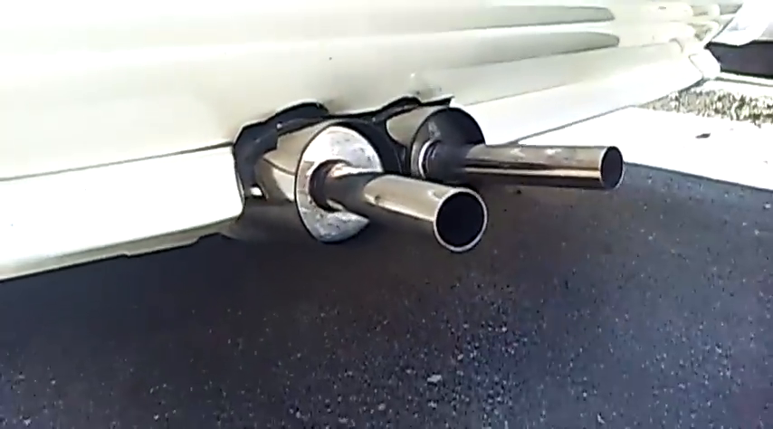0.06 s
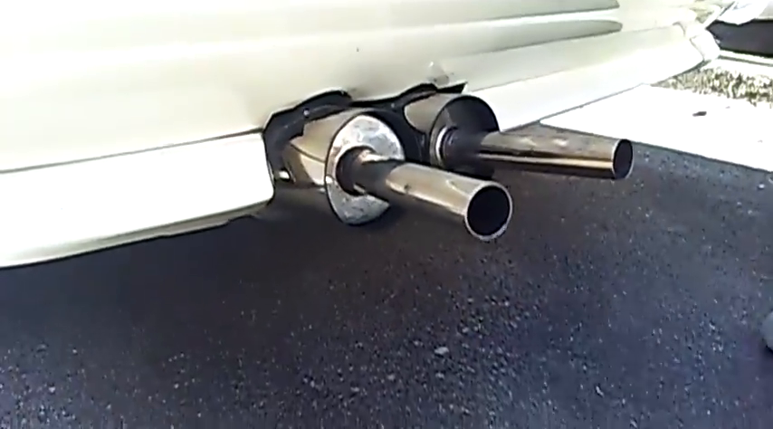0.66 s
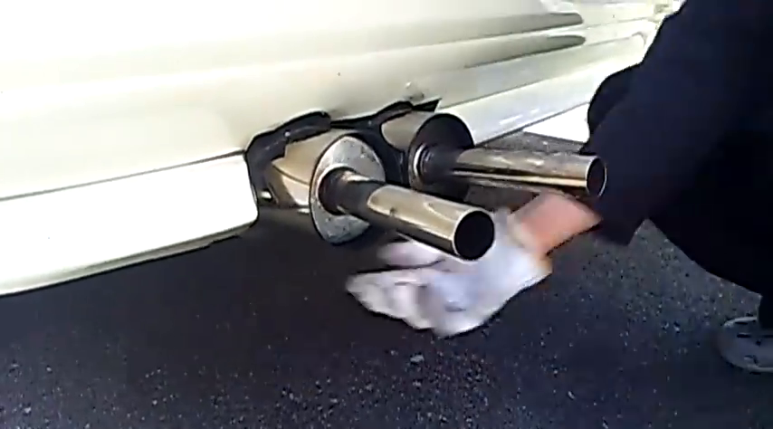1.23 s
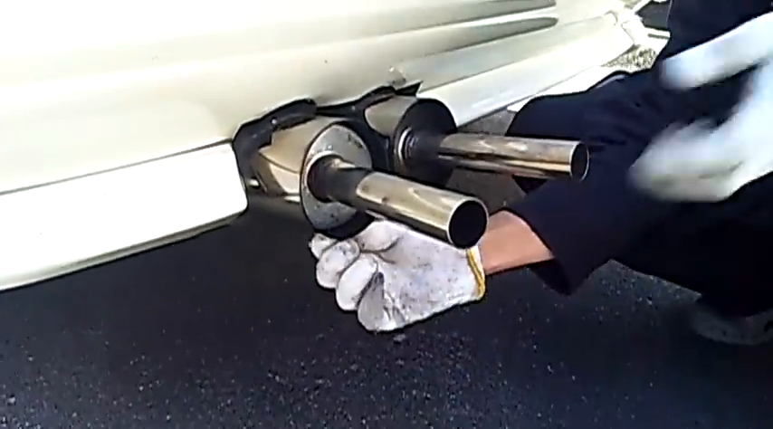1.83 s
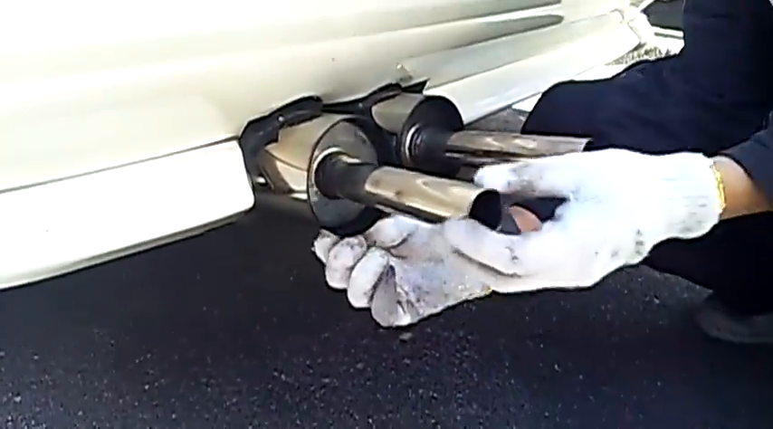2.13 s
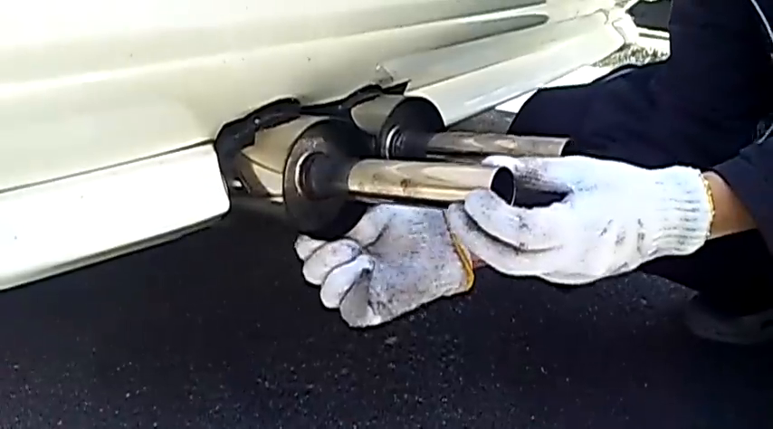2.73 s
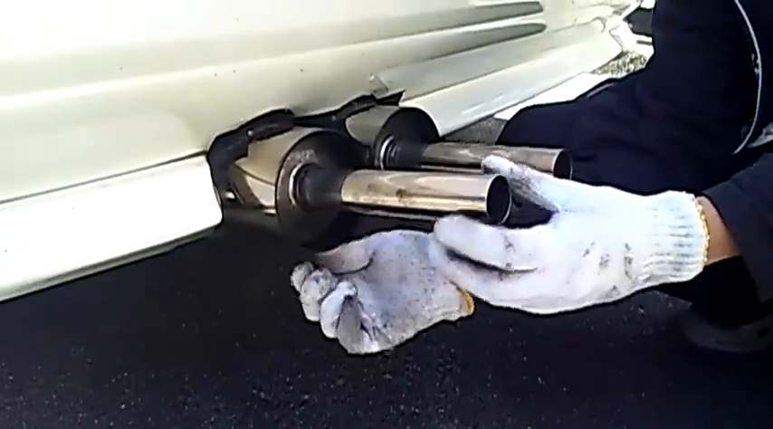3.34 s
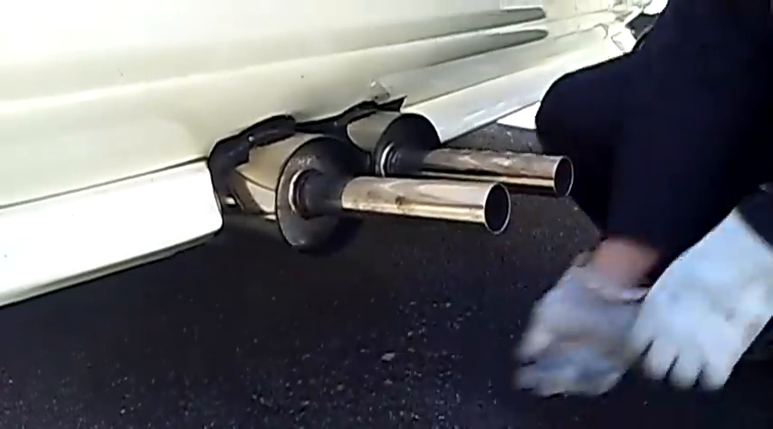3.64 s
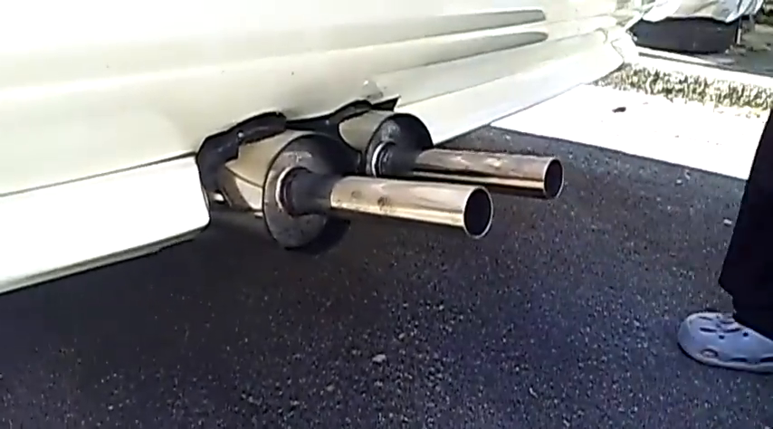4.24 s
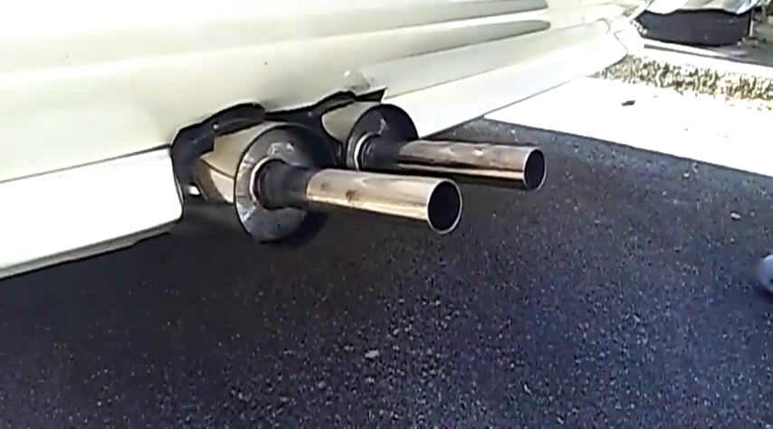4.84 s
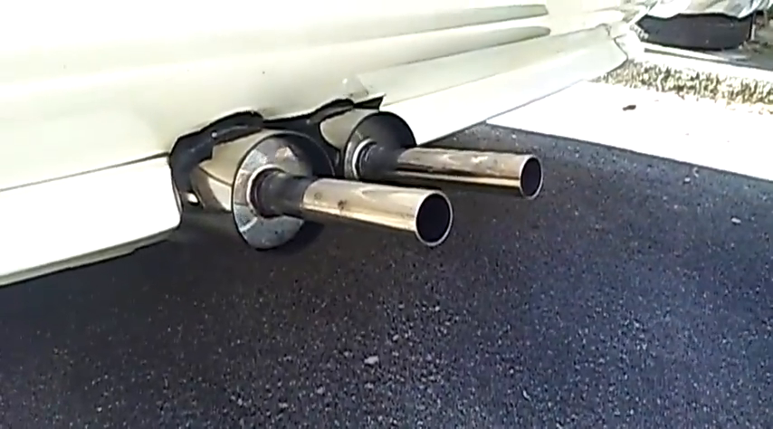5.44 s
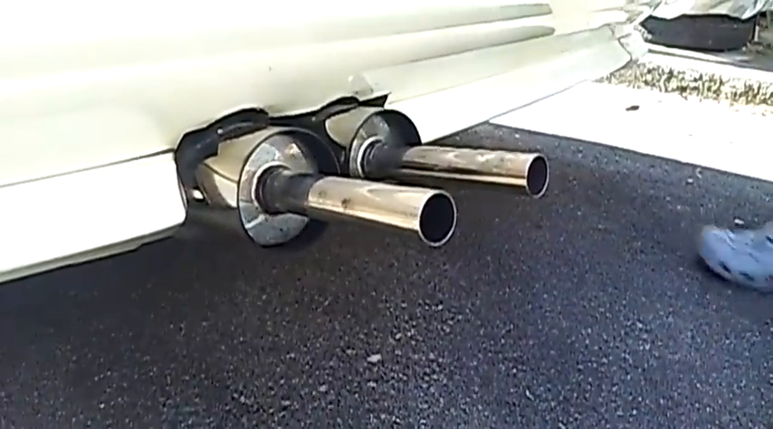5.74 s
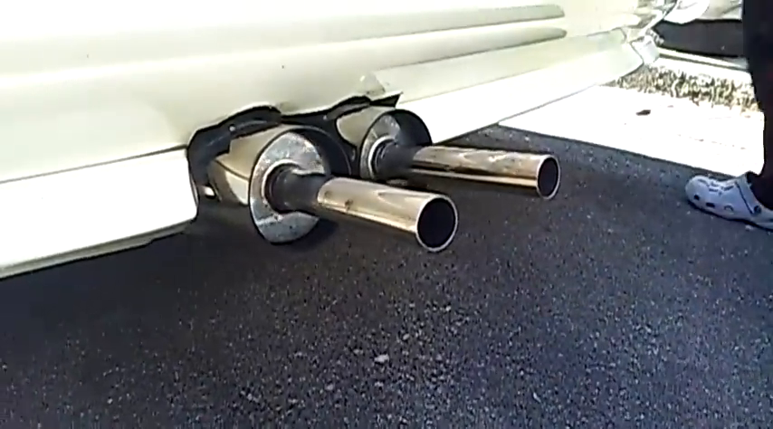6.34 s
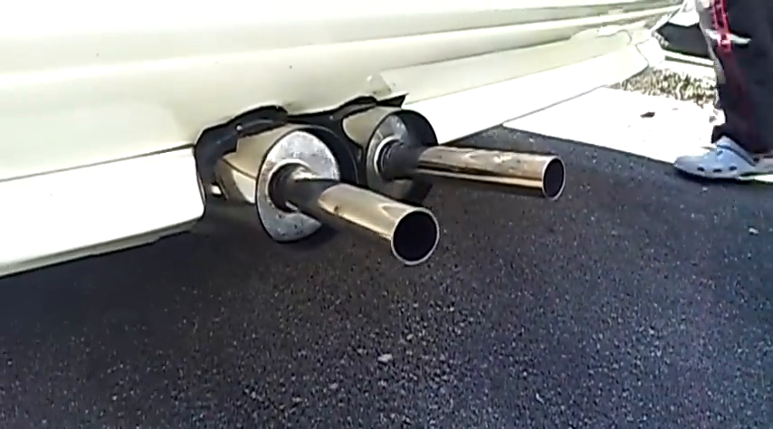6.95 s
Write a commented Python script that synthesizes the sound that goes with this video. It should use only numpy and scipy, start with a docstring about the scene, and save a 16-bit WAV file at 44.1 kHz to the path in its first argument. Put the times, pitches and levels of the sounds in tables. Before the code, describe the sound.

A six-cylinder car idles steadily close to its exhaust tips, with a thin metal rattle that stops when a gloved hand takes hold.

```python
"""A six-cylinder car idles, close to its twin exhaust tips: each firing booms in the silencer and barks
from the pipes, the note turning hollow at times as the bounce off the asphalt cancels its middle.
Over a bed of hiss, loose thin metal rattles and sizzles in step with the engine, and whistles, until
a gloved hand takes hold of a tip. The hand cups the bark, then lets go.
Small knocks, glove and shoe scuffs and rustling clothes dot the scene."""
import sys
import numpy as np
from scipy.fft import rfft, irfft, next_fast_len
from scipy.io import wavfile
from scipy.ndimage import map_coordinates

SR = 44100
rng = np.random.default_rng(int(sys.argv[2]) if len(sys.argv) > 2 else 0)


def digitize_waveform(pressure):
    """Quantize a signal to 16-bit integers and store it at the path in sys.argv[1].

    Rows of a 2-D input are taken as channels; values are limited to [-1, 1].
    """
    field = np.atleast_2d(pressure).T
    bounded = np.clip(field, -1, 1)
    quanta = np.round(bounded * 32767).astype(np.int16)
    wavfile.write(sys.argv[1], SR, quanta)


N = 316638
SIZE = next_fast_len(N + SR // 2)
HZ = np.fft.rfftfreq(SIZE, 1 / SR)
TIME = np.arange(N) / SR

# outdoor low end: (frequency [Hz], relative level [dB])
RUMBLE_EQ = [(15, -12), (40, -13.5), (80, -4), (103, -14), (150, 7), (300, -5.5), (600, -46)]
# airy top of gas and cloth: (frequency [Hz], relative level [dB])
HISS_EQ = [(1470, -32), (2500, -3), (2780, -8), (3050, -9), (3580, -12.5), (5050, -4.5), (6890, -10.5),
           (7300, -18), (9490, -41.5), (16100, -120)]
# moving clothes: (start [s], end [s], level [dB])
CLOTH_MOVES = [(3.766, 4.485, -40.5), (6.738, 7.4, -34.5)]
# glove and shoe scrapes: (time [s], level [dB], 60 dB decay [s], centre [Hz])
SCUFF_CUES = [(0.7295, -16, 0.063, 6250), (2.055, -25, 0.25, 6060), (2.094, -24, .13, 6800),
              (4.015, -24.5, 0.15, 5670), (4.142, -30, 0.25, 5940), (4.502, -26.5, 0.23, 5940),
              (5.682, -28, 0.074, 5500), (6.044, -28.5, 0.1, 4020), (6.172, -25, 0.13, 1500),
              (6.663, -21, .045, 6220), (6.695, -30, 0.079, 5830)]
# small hard knocks: (time [s], level [dB], centre [Hz])
KNOCK_CUES = [(0.726, -22, 3190), (0.735, -10.5, 3100), (4.0158, -15.5, 2180), (5.262, -20.5, 2330)]
# thin whistles: (pitch [Hz], wander [Hz], relative level [dB])
WHISTLE_TONES = [(5534, 6, 0), (3531, 10, -8)]
# ring of the thin metal: (frequency [Hz], width [Hz], relative level [dB])
METAL_MODES = [(1413, 150, 9), (1645, 240, 5.5), (1970, 270, 6), (2360, 260, 0), (2870, 210, -3.5),
               (3610, 360, -1.5), (3960, 62, 3), (4570, 900, -5.5), (5000, 73, 4), (5390, 57, 5.5),
               (5920, 110, 2.5), (6140, 260, -2.5), (6200, 130, -7), (6630, 61, 4), (6910, 420, -0.5)]
# the idle, hunting slightly: (time [s], firing rate [Hz])
IDLE_RATE = [(0.0, 56.38), (1.03, 56.81), (1.04, 56.13), (1.54, 57.21), (1.71, 56.46), (2.08, 56.83),
             (3.55, 56.72), (3.7, 56.12), (4.25, 57.15), (4.96, 56.32), (5.4, 56.7), (6.39, 57.02),
             (6.56, 56.39), (7.18, 57.5)]
# the engine's groove, in firing order: (lateness [ms], accent [dB])
FIRING_ORDER = [(.15, 2.3), (-.13, -2.1), (.04, 1.4), (-.03, -.5), (0, 1.8), (-.05, -2.9)]
# spells of hollow exhaust tone: (start [s], end [s], fade [s], share cancelled [0-1])
HOLLOW_SPELLS = [(-.2, 2.2, .13, .6), (6.25, 7.45, .4, .66)]
# bite of a steep pressure front: (frequency [Hz], relative level [dB])
FRONT_EQ = [(130, -37), (300, -21.5), (420, -2.5), (570, -5), (830, 10.5), (1050, 3), (1400, -1.5),
            (1650, -6.5), (2050, -18.5), (2250, -16.5), (2850, -33.5), (5000, -33), (8000, -51.5)]
# reflections inside the pipes: (delay [ms], gain [ratio])
PIPE_ECHOES = [(1.62, 0.43), (3.4, -0.16), (4.45, 0.33), (9.3, -0.014)]
# breath of turbulent gas: (frequency [Hz], relative level [dB])
TURBULENCE_EQ = [(110, -50.5), (220, 2), (360, -3.5), (470, 0.5), (580, -0.5), (780, 1), (1150, -6),
                 (1450, -3), (1950, -13), (2100, -3.5), (2230, -18.5), (2700, -22), (4000, -24.5),
                 (8000, -34.5)]
# body of the silencer: (frequency [Hz], width [Hz], relative level [dB])
SILENCER_MODES = [(236.1, 30.4, 0), (416.6, 41.7, -12.5)]

GRIP_S, RELEASED_S, CLOSE_S, OPEN_S = 2.1, 4.1, .08, 1  # hand on, hand fully off, length of each move
TOUCH_S, DAMP_DB_PER_S = 1.987, 174.5  # a touch chokes the metal
HISS_DB, METAL_DB, BARK_DB = -37.5, -21.5, -24  # base levels, ahead of each layer's trims
SHADE_DB = 1.26  # the glove ducks bark and hiss


def amp(db):
    """Decibels to gain."""
    return 10 ** (np.asarray(db) / 20)


def unit(x):
    """x at rms 1."""
    return x / np.sqrt(np.mean(x ** 2) + 1e-20)


def eq(points):
    """Gain curve through (Hz, dB) points on a log axis."""
    hz, db = np.transpose(points)
    return amp(np.interp(np.log(HZ + 1), np.log(hz), db))


def resonance(hz, width, f=HZ):
    """Causal response of one mode."""
    return 1j * f * width / (hz * hz - f ** 2 + 1j * f * width)


def delay(ms):
    """Response of a travel time."""
    return np.exp(-2j * np.pi * HZ * ms / 1000)


def filtered(x, response):
    """x through a frequency response."""
    return irfft(rfft(x, SIZE) * response, SIZE)[:N]


def noise(response):
    """Coloured noise of rms 1."""
    return unit(filtered(rng.standard_normal(SIZE), response))


def pulses(times, sizes):
    """Impulses between samples; those before time zero still ring into the sound."""
    at = times[:, None] * SR
    taps = np.floor(at).astype(int) + np.arange(-7, 9)
    shape = np.sinc(taps - at) * np.sinc((taps - at) / 8)
    return np.bincount((taps % SIZE).ravel(), (sizes[:, None] * shape).ravel(), SIZE)


def wobble(rate):
    """Smooth random modulation, rate knots a second."""
    return map_coordinates(rng.standard_normal(4096), [TIME * rate], mode="wrap")


def spell(start, end, rise, fall):
    """0-1 envelope: fade in from the start, hold, fade out by the end."""
    return np.clip(np.minimum((TIME - start) / rise, (end - TIME) / fall), 0, 1)


def grip():
    """How closely the hand holds the tip, 0-1."""
    return spell(GRIP_S, RELEASED_S, CLOSE_S, OPEN_S)


def looseness():
    """How freely the thin metal vibrates: 1 until it is touched, then damped to 0."""
    return amp(-DAMP_DB_PER_S * np.maximum(TIME - TOUCH_S, 0))


def rumble(level_db):
    """A faint outdoor bed under everything."""
    return amp(level_db) * noise(eq(RUMBLE_EQ))


def hiss(turns, flutter, lift_db):
    """Gas and engine bay hiss, pulsing twice a firing and lifted while the metal is loose."""
    level = amp(HISS_DB + lift_db * looseness() - SHADE_DB * grip())
    pulsing = 1 + flutter * np.cos(2 * np.pi * 2 * turns)
    return level * pulsing * noise(eq(HISS_EQ))


def contact(start, db, t60, hz, width):
    """A brief contact: noise in one broad resonance, with a hard attack and a dying tail."""
    age = np.arange(SR // 2) / SR
    band = resonance(hz, width, np.fft.rfftfreq(len(age), 1 / SR)) ** 2
    burst = unit(irfft(rfft(rng.standard_normal(len(age))) * band))
    return np.pad(burst * amp(db - 60 * age / t60), (round(start * SR), N))[:N]


def scuffs(width_hz, fade_s, grit_db):
    """Glove and shoes scrape and clothes softly rustle, all with the same gritty grain."""
    scrapes = sum(contact(s, db, t60, hz, width_hz) for s, db, t60, hz in SCUFF_CUES)
    movement = sum(amp(db) * spell(start, end, fade_s, fade_s) for start, end, db in CLOTH_MOVES)
    cloth = movement * noise(eq(HISS_EQ))
    return (scrapes + cloth) * unit(amp(grit_db * wobble(300)))


def knocks(t60_s, width_ratio):
    """Small hard knocks, each dying away in one broad resonance."""
    return sum(contact(s, db, t60_s, hz, width_ratio * hz) for s, db, hz in KNOCK_CUES)


def whistle(level_db, peak_s, fade_db_per_s, waver_db):
    """Two thin tones from the loose metal waver in pitch and level, swell, then slowly fade."""
    tones = 0
    for hz, wander, db in WHISTLE_TONES:
        level = amp(db + waver_db * wobble(40))
        pitch = hz + wander * wobble(60)
        tones += level * np.sin(2 * np.pi * np.cumsum(pitch) / SR)
    swell = amp(level_db - fade_db_per_s * np.abs(TIME - peak_s))
    return swell * looseness() * unit(tones)


def rattle(times, after_ms, jitter_ms, scatter_db, ring_hz, width_hz, trim_db):
    """The loose metal clinks once between firings, never twice alike."""
    slip, accent = rng.standard_normal((len(times), 2)).T
    hits = pulses(times + (after_ms + jitter_ms * slip) / 1000, amp(scatter_db * accent))
    clinks = unit(filtered(hits, resonance(ring_hz, width_hz) ** 2))
    return amp(METAL_DB + trim_db) * looseness() * clinks


def sizzle(turns, flutter, trim_db):
    """Thin metal buzzes in its modes, swelling with the firings."""
    power = sum(np.abs(amp(db) * resonance(hz, width) ** 2) ** 2 for hz, width, db in METAL_MODES)
    shake = rng.standard_normal(N) * (1 + flutter * np.cos(2 * np.pi * turns))
    return amp(METAL_DB + trim_db) * looseness() * unit(filtered(shake, np.sqrt(power)))


def firings(turns, jitter_ms, scatter_db):
    """Times and strengths of the exhaust blows: each cylinder has its own timing and accent."""
    n = np.arange(-len(FIRING_ORDER), int(turns[-1]) + 1)
    late_ms, db = np.array(FIRING_ORDER)[n % len(FIRING_ORDER)].T
    slip, accent = rng.standard_normal((len(n), 2)).T
    pre_roll = np.minimum(n - turns[0], 0) / IDLE_RATE[0][1]  # the engine is already running
    due = np.interp(n, turns, TIME) + pre_roll
    return due + (late_ms + jitter_ms * slip) / 1000, amp(db + scatter_db * accent)


def hollowed(x, notch_hz, width_hz):
    """From some angles the bounce off the asphalt scoops the mids out of the exhaust note."""
    depth = sum(share * spell(start, end, fade, fade) for start, end, fade, share in HOLLOW_SPELLS)
    return x - depth * filtered(x, resonance(notch_hz, width_hz))


def cupped(x, ring_hz, width_hz, cup_db):
    """A hand at the tip forms a small hollow that lifts one band."""
    return x + amp(cup_db) * grip() * filtered(x, resonance(ring_hz, width_hz))


def bark(times, sizes, accent_power, scatter_db, front_db, puff_db, puff_ms, stream_db):
    """Each blow steepens to a sharp front in the pipe and tears a puff of turbulence from the tip."""
    blows = pulses(times, sizes ** accent_power * amp(scatter_db * rng.standard_normal(len(times))))
    echoes = 1 + sum(gain * delay(ms) for ms, gain in PIPE_ECHOES)
    front = unit(filtered(blows, -1j * eq(FRONT_EQ) * echoes))  # a jump from suction to pressure
    front = cupped(front, ring_hz=570, width_hz=22, cup_db=13)
    gusts = delay(-.35) + delay(PIPE_ECHOES[-1][0] - .3)  # one with the blow, one with its last echo
    gate = np.abs(filtered(blows, gusts / (1 + 2j * np.pi * HZ * puff_ms / 1000)))
    puffs = unit(filtered(gate * rng.standard_normal(N), eq(TURBULENCE_EQ)))
    stream = noise(eq(TURBULENCE_EQ))
    blend = amp(front_db) * front + amp(puff_db) * puffs + amp(stream_db) * stream
    return amp(BARK_DB - SHADE_DB * grip()) * blend


def boom(times, sizes, turns, lead_ms, soft_hz, low_cut_hz, boom_db, leak_db, throb_db):
    """The broad push of each blow rings the silencer, over a throb at the firing rate."""
    low_cut = HZ ** 10 / (HZ ** 10 + low_cut_hz ** 10)
    push = np.exp(-(HZ / soft_hz) ** 2) * low_cut * delay(-lead_ms)
    modes = sum(amp(db) * resonance(hz, width) for hz, width, db in SILENCER_MODES)
    body = modes + amp(leak_db)  # part passes straight through
    ring = unit(filtered(pulses(times, sizes), -push * body))
    throb = unit(np.cos(2 * np.pi * turns))
    return amp(boom_db) * ring - amp(throb_db) * throb


def scene():
    """The mix: exhaust up front, with metal and hiss on the same firing clock, and foley around it."""
    rate = np.interp(TIME, *np.transpose(IDLE_RATE))
    turns = -.872 + np.cumsum(rate) / SR  # the clock: one turn a firing
    times, sizes = firings(turns, jitter_ms=.08, scatter_db=.7)
    lows = boom(times, sizes, turns, lead_ms=1.103, soft_hz=630, low_cut_hz=160.3,
                boom_db=-12, leak_db=-33, throb_db=-34.5)
    mids = bark(times, sizes, accent_power=.1, scatter_db=.6, front_db=3.2,
                puff_db=-7, puff_ms=3.2, stream_db=-2.2)
    exhaust = hollowed(lows + mids, notch_hz=693, width_hz=202)
    bed = hiss(turns, flutter=.058, lift_db=4.5) + rumble(level_db=-36.5)
    metal = sizzle(turns, flutter=.088, trim_db=-2)
    metal += whistle(level_db=-34.5, peak_s=.28, fade_db_per_s=6, waver_db=1)
    metal += rattle(times, after_ms=11, jitter_ms=.7, scatter_db=1.6,
                    ring_hz=2440, width_hz=190, trim_db=-10)
    foley = knocks(t60_s=.045, width_ratio=.29) + scuffs(width_hz=3900, fade_s=.23, grit_db=3)
    return exhaust + bed + metal + foley


def record(dry):
    """A steep high cut, the tallest peaks clipped flat, then a ceiling on the clipping's overtones."""
    high_cut_hz, clip_level, top_hz = 7350, .74, 15800
    narrow = filtered(dry, 1 / np.sqrt(1 + (HZ / high_cut_hz) ** 160))
    clipped = narrow / (1 + np.abs(narrow / clip_level) ** 14) ** (1 / 14)
    return filtered(clipped, HZ < top_hz)


dry = scene()
out = record(dry)
digitize_waveform(out)
```